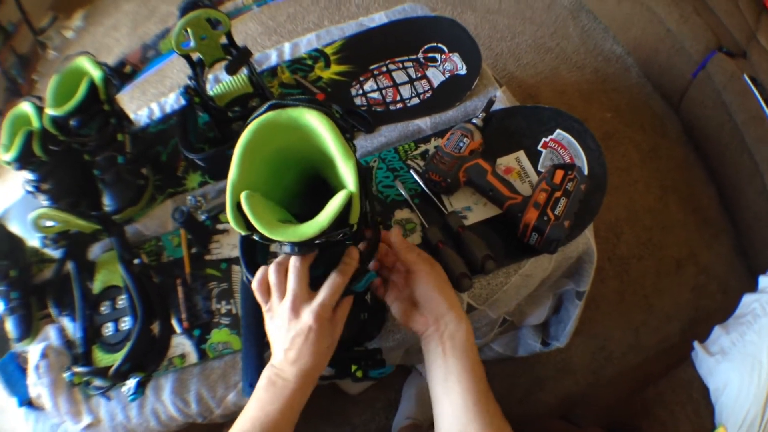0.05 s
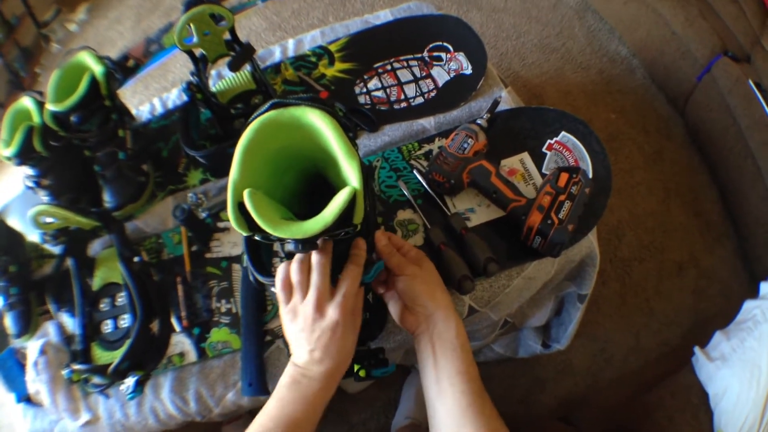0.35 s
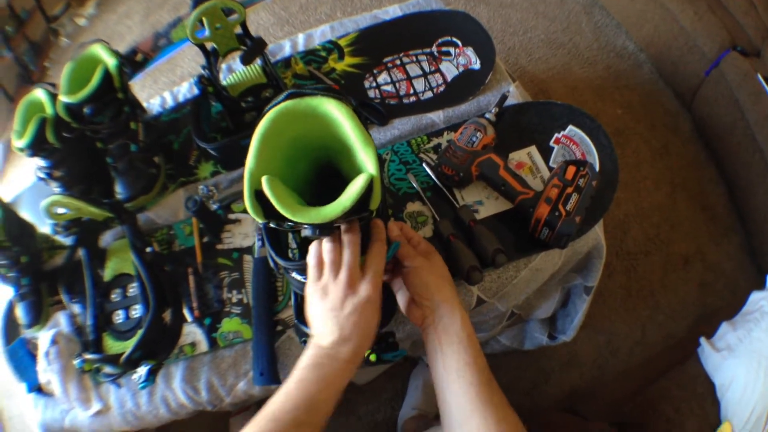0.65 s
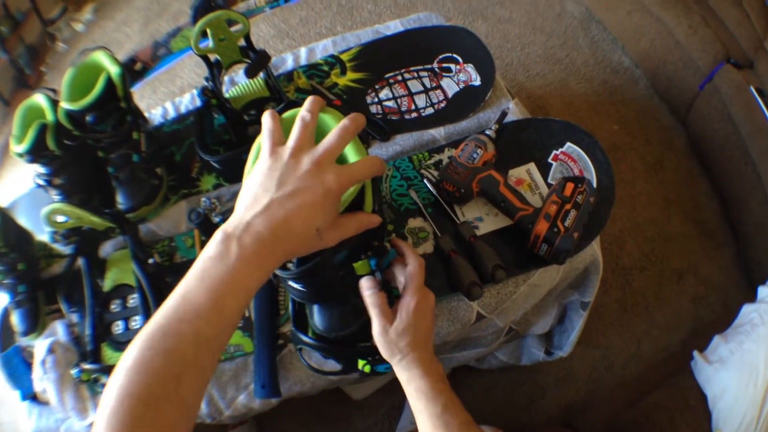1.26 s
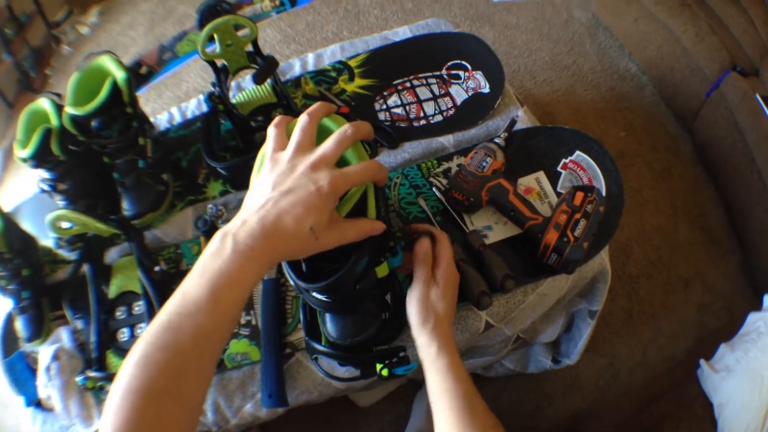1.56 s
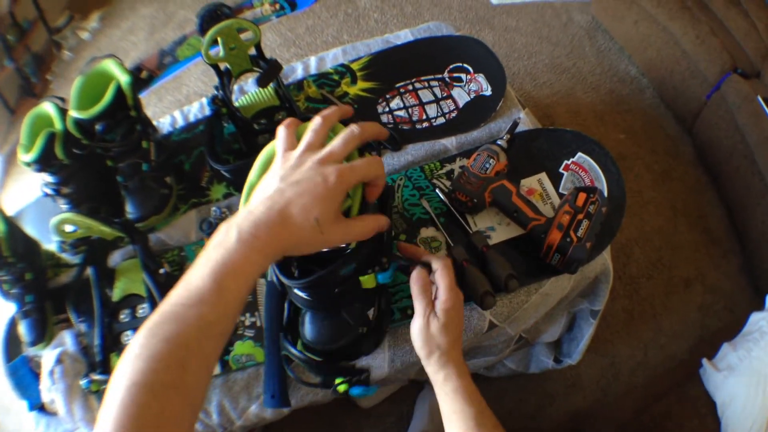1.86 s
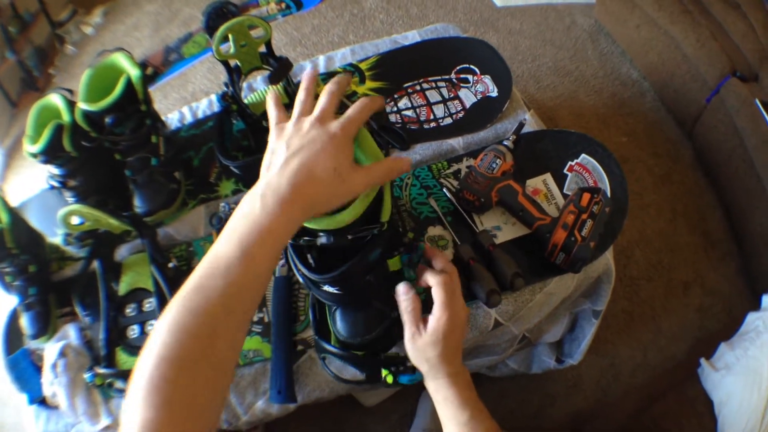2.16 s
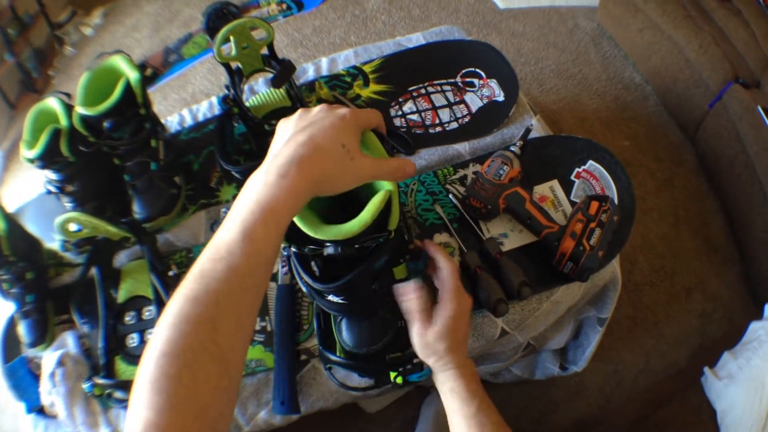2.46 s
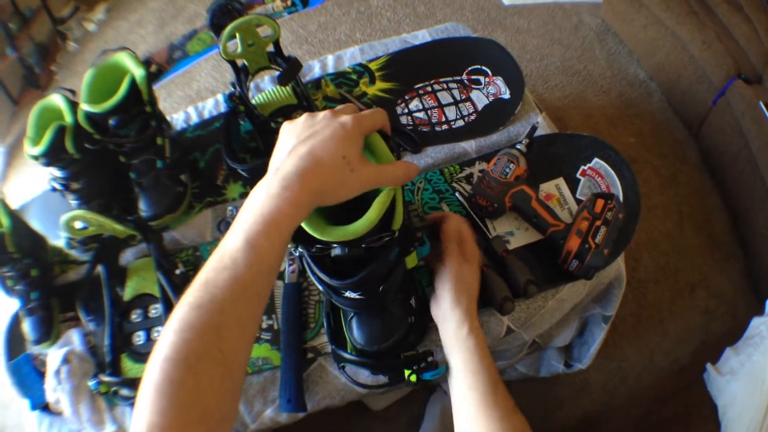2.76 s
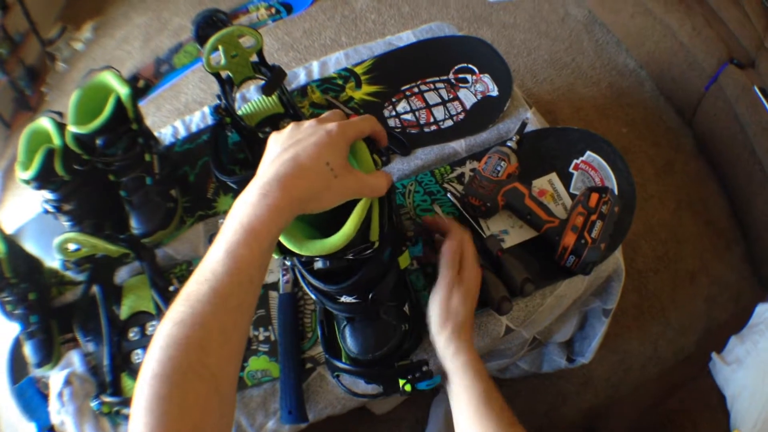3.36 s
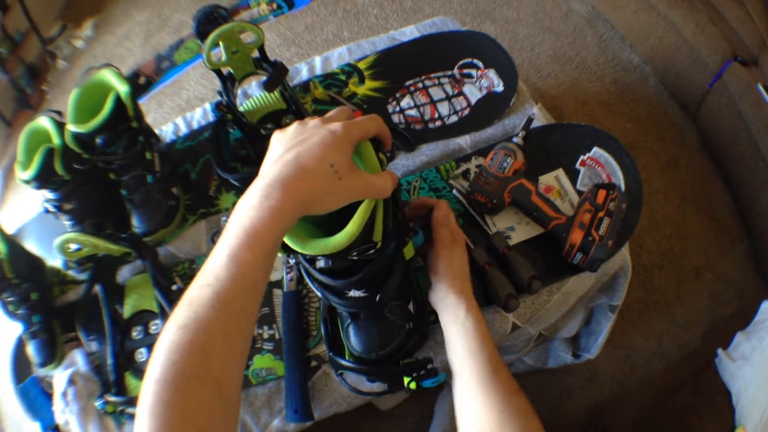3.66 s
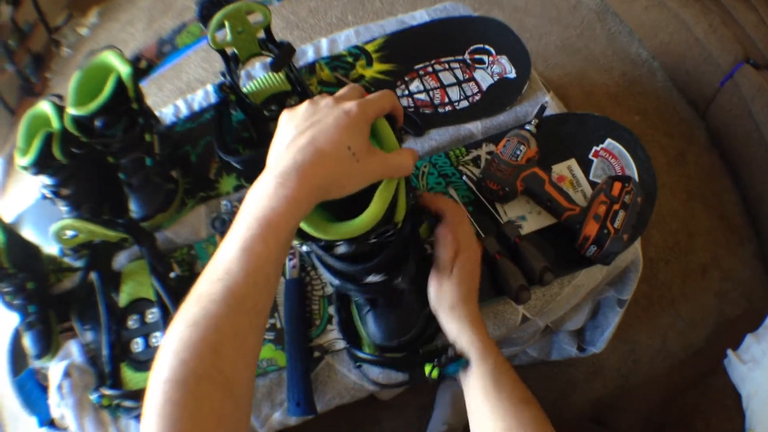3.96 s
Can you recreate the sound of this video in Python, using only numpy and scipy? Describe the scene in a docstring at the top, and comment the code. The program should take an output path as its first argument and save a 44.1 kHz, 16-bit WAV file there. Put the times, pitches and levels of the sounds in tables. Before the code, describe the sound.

A snowboard binding's ratchet clicks sharply three times around 0.5 seconds, followed by soft boot thumps, then three more times around 1.5 seconds. The plastic lever clacks just after 2 seconds, and another click run comes near 2.6. From there until 4 seconds, clicks, clacks, thumps and faint rubbing crowd together, with the strongest thump at 3.1. Everything sounds close, in a small room with low steady hiss.

```python
"""In a small room, hands work the ratchet buckle of a snowboard binding, close to a head-worn camera.
Each impact excites damped modes: the pawl snaps over the strap's teeth, the plastic lever clacks,
and the padded boot thumps as it is gripped and rocked. Friction makes strap and boot rub and squeak.
Nearby walls reflect the blows, over a steady hiss."""
import sys
import numpy as np
from scipy import signal
from scipy.fft import rfft, irfft, next_fast_len
from scipy.io import wavfile
from scipy.ndimage import map_coordinates

SR = 44100
rng = np.random.default_rng(int(sys.argv[2]) if len(sys.argv) > 2 else 0)


def unload_audio(sound):
    """Save the sound as a 16-bit wav file, at the path given as the first command line argument."""
    columns = np.transpose(np.atleast_2d(sound))
    # keep every value between -1 and 1, then stretch to whole-number steps
    steps = np.round(np.clip(columns, -1, 1) * 32767)
    wavfile.write(sys.argv[1], SR, steps.astype(np.int16))


N = 176400
BLOW_T = np.arange(SR // 5) / SR  # time axis of one blow, in seconds

# Spectrum that pawl and latch send into the room. Each row: frequency in Hz, relative level in dB.
CLICK_REVERB = [(150, -69), (600, -3.5), (1400, -6.5), (3500, -6.5), (4600, 0), (5700, -4.5), (7300, 5.5),
                (8300, -1.5), (10000, -13), (12500, -23), (15000, -23)]


def pawl():
    """Impact excitation: the pawl drags up a tooth, snaps down with a crack and rings in its modes."""
    # Snaps over a tooth. Each row: start in seconds, relative level in dB, main ring's pitch in Hz,
    # then the gains of that ring, the treble and the drag in dB.
    clicks = [(0.3898, -23.5, 4000, -3, -5.5, -9.5), (0.4518, -19, 3850, 6, -4, -19),
              (0.5280, -18.5, 3880, 8.5, -7.5, -18), (1.431, -22.5, 3820, -17, 1, -6),
              (1.5207, -18, 3900, 4, -2, -15), (1.6255, -17.5, 3580, 11, -1.5, -15),
              (2.5675, -14, 3730, 5, -7.5, -22.5), (2.6264, -16.5, 3850, 1.5, -1.5, -18),
              (2.6935, -19.5, 3437, 14, 1.5, -14), (3.1230, -16, 3300, 4, -1, -12.5),
              (3.1631, -18, 3640, 3, 0.5, -24), (3.5869, -16, 3440, 8, -1, -16.5),
              (3.622, -14.5, 3570, 8, -4.5, -18), (3.6978, -16.5, 3550, 13.5, 0.5, -12.5),
              (3.8730, -17.5, 3600, 7, -2, -17)]
    # The pawl's other modes. Each row: frequency in Hz, relative level in dB, T60 in seconds.
    pawl_modes = [(694, -15.5, 0.02), (1267, -18.5, 0.039), (1910, -12.5, 0.015), (7020, -1, 0.0059),
                  (8340, -6, 0.007), (14400, -18, .005)]
    # Spectra of the crack and the drag. Each row: frequency in Hz, relative level in dB.
    crack_spectrum = [(300, -29), (1500, -27), (3500, 0.5), (5500, -3), (7500, 6.5), (10000, -9.5),
                      (12500, -19), (15000, -23)]
    drag_spectrum = [(60, -37), (250, -21), (700, -12.5), (1400, -5.5), (2050, 0.5), (3800, -5.5),
                     (5200, -22), (8000, -17), (14000, -46)]
    drag_lead_s = 0.0038
    out = np.zeros(N)
    for start, db, ring_hz, ring_db, treble_db, drag_db in clicks:
        modes = ring(pawl_modes, attack=0.00032, scatter_db=2, detune=0.0037)
        main_ring = amp(ring_db + 3.5) * fade(t60=0.0046, attack=0.00079) * sine(ring_hz)
        crack = amp(-7) * noise(crack_spectrum) * fade(t60=0.01, attack=0.000067)
        snap = in_room(unit(modes + main_ring + crack), CLICK_REVERB, tail_db=-4, walls_db=-5)
        add(out, start, amp(db - 16.5) * shelf(snap, treble_db, corner_hz=5050))
        drag = unit(noise(drag_spectrum) * fade(t60=0.046, attack=0.0007))
        add(out, start - drag_lead_s, amp(db + drag_db - 11) * drag)
    return out


def lever():
    """Impact and reflection: the hollow lever knocks once, followed about 10 ms later
    by a softer, duller wall echo; its latch ticks."""
    # Knocks against the base. Each row: start in seconds, relative level in dB,
    # then the gains of the treble, the latch tick and the hollow ring in dB.
    clacks = [(1.065, -38, -23, -29, -7), (2.0715, -25, -0.5, -5.5, 3.5), (2.1447, -25.5, 1, -9, 3),
              (2.206, -42, 6, -4.5, 4), (2.8985, -23, 2.5, -9.5, 4), (2.9322, -26.5, 1.5, -9, -1.5),
              (2.946, -29, -3, -13, -23), (3.1052, -27, -5.5, -29, -24), (3.4264, -24.5, -2, -10.5, -8),
              (3.454, -30, 0.5, -4.5, -18), (3.6865, -34.5, 6.5, -23, -1), (3.81, -22.5, -0.5, -16, -1.5),
              (3.8450, -25, -0.5, -10, -7), (3.872, -25.5, -16, -2, -12)]
    # Modes of the plastic. Each row: frequency in Hz, relative level in dB, T60 in seconds.
    lever_modes = [(400, -13.5, 0.019), (610, -9, 0.043), (967, -9, 0.025), (1283, -11, 0.033),
                   (1830, -2, 0.023), (2080, -8, 0.013), (2620, -2.5, 0.013), (3810, -10.5, 0.01)]
    # Spectra of scrape, tick and reverberation. Each row: frequency in Hz, relative level in dB.
    scrape_spectrum = [(100, -21), (250, -0.5), (700, 4), (850, -4), (1150, -1.5), (1480, -15), (1900, 2.5),
                       (2400, -13.5), (3600, -8), (5200, -31), (14000, -37)]
    tick_spectrum = [(3000, -4.5), (5500, -18), (7000, -1), (8400, 4.5), (10000, -33), (12500, -25),
                     (15000, -11)]
    reverb_spectrum = [(80, -60), (250, 3.5), (680, -1), (850, 0.5), (1200, -6), (2000, -3), (3500, -17),
                       (5500, -21), (8000, -18.5), (12500, -32), (15000, -31)]
    hollow_hz, hollow_t60 = 683.3, 0.069
    out = np.zeros(N)
    for start, db, treble_db, tick_db, hollow_db in clacks:
        hollow_mode = (hollow_hz, hollow_db - 0.5, hollow_t60)
        knock = ring([hollow_mode], attack=0.0016, scatter_db=5, detune=0.0095)
        wall_echo_s = 0.01 * np.exp(rng.normal(0, 0.237))
        for delay, arrival_db, dull_db in [(0, 0, 0), (wall_echo_s, -5, -23)]:
            modes = ring(lever_modes, attack=0.0016, scatter_db=2, detune=0.042)
            scrape = amp(-13.5) * unit(noise(scrape_spectrum) * fade(t60=0.011, attack=0.0015))
            add(knock, delay, amp(arrival_db) * shelf(modes + scrape, dull_db, corner_hz=1500))
        tick = amp(tick_db - 11) * unit(noise(tick_spectrum) * fade(t60=0.016, attack=0.00055))
        knock = low_cut(knock, corner_hz=238)  # the knock carries little bass
        knock = unit(in_room(knock, reverb_spectrum, tail_db=-9.5, walls_db=3))
        knock = shelf(knock, treble_db, corner_hz=1340)
        tick = in_room(tick, CLICK_REVERB, tail_db=-3.5, walls_db=1.5)
        add(out, start, amp(db - 4) * (knock + tick))
    return out


def boot():
    """Damped resonance: the padded boot thumps low; a short contact thuds, a long one scuffs."""
    # Each row: start in seconds, relative level in dB, pitch in Hz, slap gain in dB,
    # contact time in seconds.
    thumps = [(0.6193, -22, 221, -5, 0.00052), (0.646, -29.5, 229, -20, 0.0022),
              (0.7538, -31.5, 242, -11.5, 0.0022), (1.1247, -29, 240, -10, 0.005),
              (1.192, -34, 223, -15, 0.0026), (1.2084, -36, 254, -8.5, 0.0032),
              (1.896, -37.5, 177, -8, 0.0028), (2.146, -34, 205, -27, .003), (2.350, -40.5, 220, -9, .003),
              (2.722, -24.5, 236, -30, .003), (2.7471, -24, 251, -10.5, 0.0034),
              (2.828, -25.5, 249, -12.5, 0.0038), (3.1141, -14, 251, -13, 0.0017),
              (3.2549, -24.5, 290, -5.5, 0.0032), (3.27, -18, 242, -11.5, 0.0019),
              (3.3029, -21, 216, -9, 0.0017), (3.322, -29.5, 174, -25, 0.0021),
              (3.69, -27.5, 207, -11, 0.0013), (3.737, -34, 236, -18, .003), (3.75, -33, 240, -18, 0.0026),
              (3.846, -27.5, 275, -21, 0.0025), (3.872, -33.5, 200, -27, .003)]
    # The boot's modes. Each row: multiple of the pitch, relative level in dB, T60 in seconds.
    boot_modes = [(.68, -6, 0.071), (1, 5, 0.052), (1.65, -1.5, 0.045)]
    # Spectra of the slap and the reverberation. Each row: frequency in Hz, relative level in dB.
    slap_spectrum = [(60, -32), (330, 9), (800, -2), (1150, 6), (1500, 7.5), (1900, -2), (3000, -13),
                     (5000, -56), (14000, -54)]
    reverb_spectrum = [(50, -43), (110, -3), (170, 8), (260, -12.5), (400, -8.5), (700, -4), (1400, -25),
                       (3000, -33), (8000, -45)]
    scuff_from_s = 0.002  # longer contacts gain treble, shorter ones lose it
    out = np.zeros(N)
    for start, db, hz, slap_db, contact_s in thumps:
        modes = [(hz * ratio, level, t60) for ratio, level, t60 in boot_modes]
        body = unit(ring(modes, attack=0.0031, scatter_db=3.5, detune=0.023))
        scuff = shelf(noise(slap_spectrum), 17 * np.log(contact_s / scuff_from_s), corner_hz=1800)
        slap = amp(slap_db - 1) * unit(scuff * fade(t60=0.0066 + 11 * contact_s, attack=contact_s))
        thump = unit(in_room(body + slap, reverb_spectrum, tail_db=-16.5, walls_db=0.5))
        add(out, start, amp(db - 4.5) * thump)
    return out


def rubbing():
    """Sliding friction: grainy noise swells with each pull and sounds through the hollow plastic."""
    # Pulls on strap and boot. Each row: peak time, rise and fall in seconds, relative level in dB.
    pulls = [(1.124, 0.027, 0.029, -49.5), (1.221, 0.0075, 0.12, -54), (1.44, 0.012, 0.083, -47.5),
             (1.686, 0.078, 0.054, -44), (2.24, 0.018, 0.068, -49.5), (2.64, 0.088, 0.1, -49),
             (2.76, 0.068, 0.12, -47.5), (2.945, 0.048, 0.068, -45), (3.111, 0.046, 0.032, -41.5),
             (3.261, 0.044, 0.085, -39.5), (3.444, 0.028, 0.033, -41), (3.635, 0.082, 0.072, -40),
             (3.75, 0.047, 0.074, -47.5), (3.869, 0.062, 0.031, -39.5)]
    # Spectrum of the friction. Each row: frequency in Hz, relative level in dB.
    rub_spectrum = [(60, -41), (180, 3), (400, -10), (590, 3), (850, -9.5), (1250, -9), (2400, -16),
                    (4500, -30.5), (8000, -36.5), (14000, -56)]
    t = np.arange(N) / SR
    swell = sum(amp(db) * np.exp(-((t - peak) / np.where(t < peak, rise, fall)) ** 2)
                for peak, rise, fall, db in pulls)
    slips = amp(3.3 * wobble(300)) * rng.standard_normal(N)
    friction = filtered(slips, lambda hz: amp(along(rub_spectrum, hz)))
    return amp(1) * swell * friction / friction.std()


def squeaks():
    """Stick-slip oscillation: the plastic strap briefly sings a wavering note."""
    # Each row: peak time in seconds, half length in seconds, pitch in Hz, level in dB.
    notes = [(2.884, .011, 1228, -39), (3.657, 0.0078, 667, -32)]
    t = np.arange(N) / SR
    out = np.zeros(N)
    for peak, half_length, hz, db in notes:
        swell = amp(db) * np.exp(-((t - peak) / half_length) ** 2)
        pitch_hz = hz * (1 + 0.022 * wobble(200))
        out += swell * np.sin(2 * np.pi * np.cumsum(pitch_hz) / SR)
    return out


def in_room(blow, spectrum, tail_db, walls_db):
    """Reflection and reverberation: a blow is followed by early echoes and a short diffuse tail."""
    # Wall echoes. Each row: delay in seconds, relative level in dB.
    echoes = [(.0075, -15.5), (0.0112, -16.5), (0.0139, -19), (.0255, -20), (0.035, -19)]
    # The room's decay. Each row: frequency in Hz, T60 in seconds.
    reverb_times = [(150, 0.69), (700, 0.38), (3000, 0.19), (8000, 0.22), (15000, 0.2)]
    tail_start_s, tail_rise_s = 0.0054, 0.0018
    hz, t, bands = signal.stft(noise(spectrum), SR, nperseg=256)
    decay = np.exp(-np.log(1000) * t / along(reverb_times, hz)[:, None])
    tail = signal.istft(bands * decay, SR, nperseg=256)[1][:len(BLOW_T)]
    clumps = amp(2.5 * wobble(449, size=len(BLOW_T)))  # reflections arrive in clumps
    tail = tail * clumps * np.clip((BLOW_T - tail_start_s) / tail_rise_s, 0, 1)
    out = blow + amp(tail_db) * np.linalg.norm(blow) * tail / np.linalg.norm(tail)
    head_shifts_s = rng.normal(0, 0.0004, len(echoes))  # the head moves between blows
    for (delay, db), shift in zip(echoes, head_shifts_s):
        add(out, abs(delay + shift), amp(db + walls_db) * blow)
    return out


def hiss():
    """Noise floor: room tone and microphone hiss at a nearly steady level."""
    # Each row: frequency in Hz, relative level in dB.
    floor_spectrum = [(25, -58), (79, -21.5), (144, 1), (240, 1), (297, -7.5), (399, -11), (680, -3.5),
                      (919, -7.5), (1200, -3.5), (1410, -8), (2400, -14.5), (3340, -19.5), (3930, -16.5),
                      (5580, -24.5), (7300, -23.5), (12500, -42.5), (15500, -25)]
    return amp(-52 + 0.22 * wobble(5.76)) * noise(floor_spectrum, N)


def ring(modes, attack, scatter_db, detune):
    """Modal superposition: damped sines of alternating sign, varied in level and pitch at every blow."""
    draws = rng.standard_normal((len(modes), 2))
    out = np.zeros(len(BLOW_T))
    for k, ((hz, db, t60), (level_draw, pitch_draw)) in enumerate(zip(modes, draws)):
        envelope = amp(db + scatter_db * level_draw) * fade(t60, attack)
        out += (-1) ** k * envelope * sine(hz * (1 + detune * pitch_draw))
    return out


def sine(hz):
    """Simple harmonic motion for the length of one blow."""
    return np.sin(2 * np.pi * hz * BLOW_T)


def fade(t60, attack):
    """Exponential decay by 60 dB in t60 seconds, with a smooth onset."""
    return np.exp(-np.log(1000) * BLOW_T / t60) * (1 - np.exp(-BLOW_T / attack))


def noise(spectrum, size=len(BLOW_T)):
    """Spectral shaping of white noise, scaled to rms 1."""
    x = filtered(rng.standard_normal(size), lambda hz: amp(along(spectrum, hz)))
    return x / x.std()


def wobble(rate, size=N):
    """Random modulation: a smooth curve with rate knots a second."""
    return map_coordinates(rng.standard_normal(4096), [np.arange(size) * rate / SR], mode="wrap")


def filtered(x, response):
    """Linear filtering: the spectrum of x times a frequency response."""
    size = next_fast_len(len(x) + 8192)
    return irfft(rfft(x, size) * response(np.fft.rfftfreq(size, 1 / SR)), size)[:len(x)]


def shelf(x, treble_db, corner_hz):
    """Shelving filter: raises or lowers everything above the corner."""
    return filtered(x, lambda hz: amp(treble_db * hz ** 4 / (hz ** 4 + corner_hz ** 4)))


def low_cut(x, corner_hz):
    """Second-order high-pass filter."""
    return signal.sosfilt(signal.butter(2, corner_hz, "high", fs=SR, output="sos"), x)


def along(points, hz):
    """Interpolation of (Hz, value) points on a logarithmic frequency axis."""
    knots_hz, values = np.transpose(points)
    return np.interp(np.log(hz + 1), np.log(knots_hz + 1), values)


def amp(db):
    """Decibels to amplitude ratio."""
    return 10 ** (np.asarray(db) / 20)


def unit(x):
    """Energy normalisation: a blow gets the energy of rms 1 held for 10 ms."""
    return x / np.linalg.norm(x) * np.sqrt(0.01 * SR)


def add(track, start, x):
    """Superposition of x on the track from start seconds."""
    part = track[round(start * SR):][:len(x)]
    part += x[:len(part)]


def scene():
    """Superposition of all sources at one microphone."""
    return (pawl() + lever() + boot() + rubbing() + squeaks() + hiss())[None]


def record(dry):
    """Band limiting: the camera thins the deep bass and passes nothing above 15.5 kHz."""
    thin = low_cut(dry, corner_hz=54)
    return np.array([filtered(channel, lambda hz: hz < 15500) for channel in thin])


dry = scene()
out = record(dry)
unload_audio(out)
```